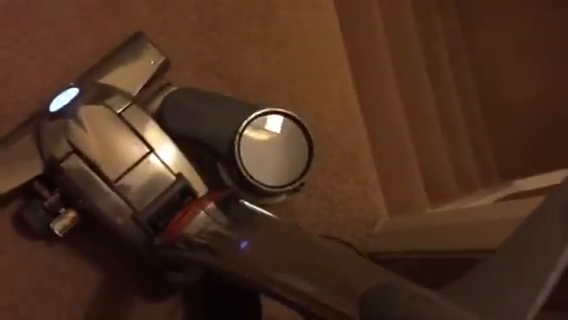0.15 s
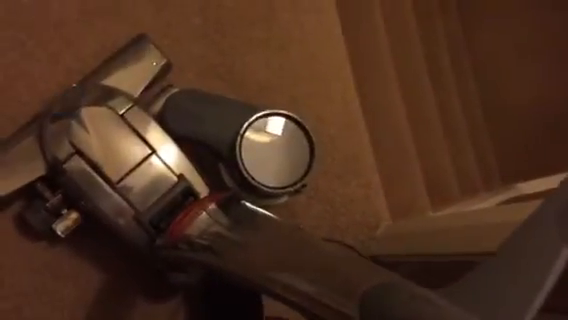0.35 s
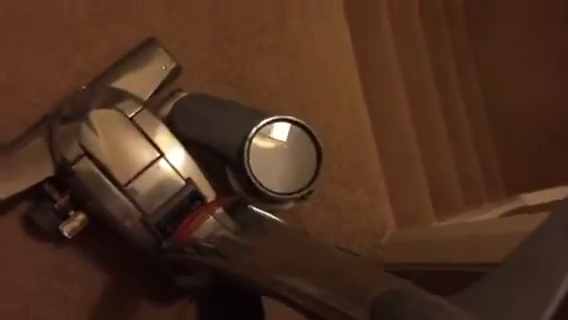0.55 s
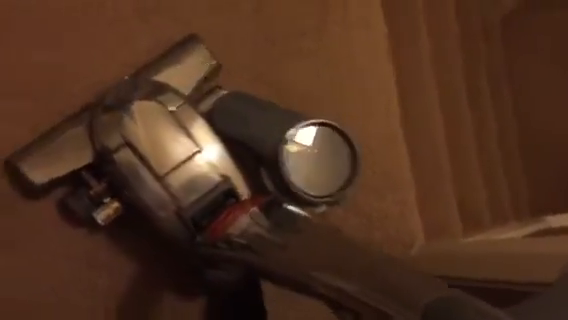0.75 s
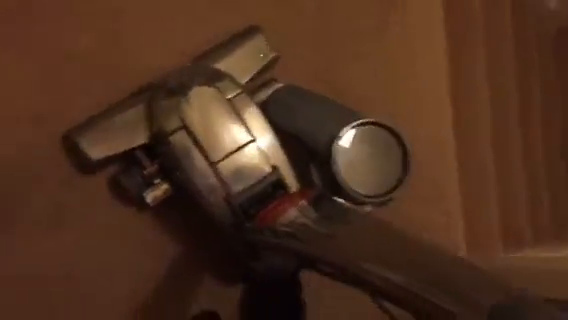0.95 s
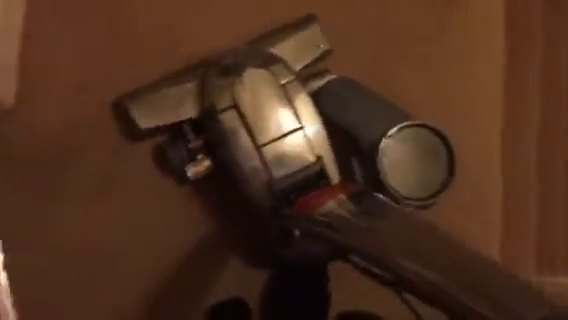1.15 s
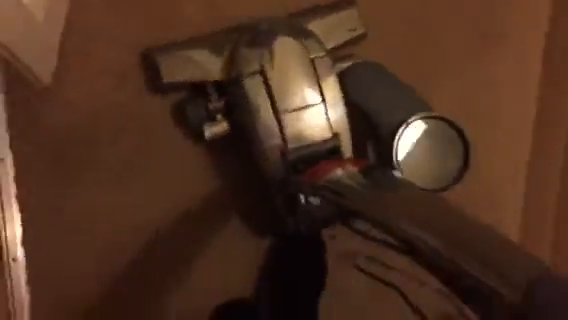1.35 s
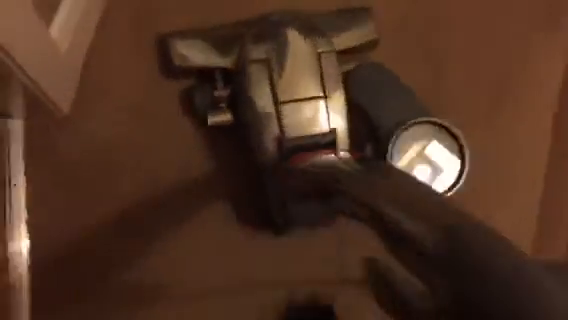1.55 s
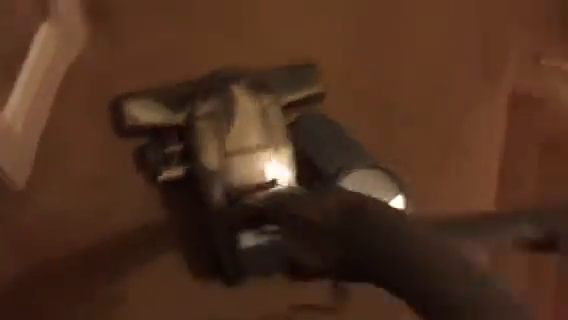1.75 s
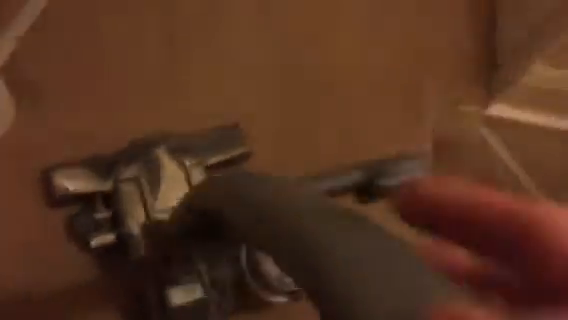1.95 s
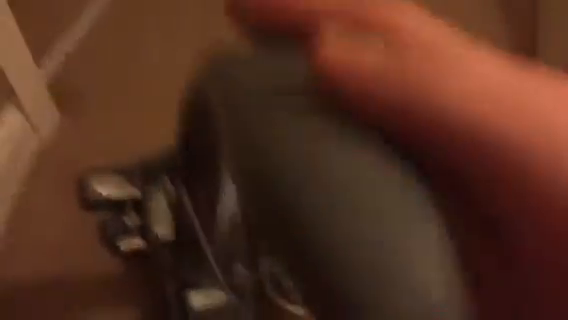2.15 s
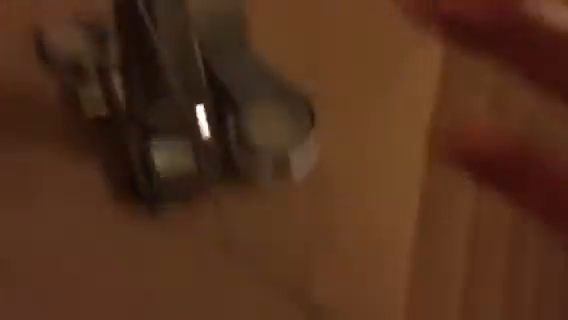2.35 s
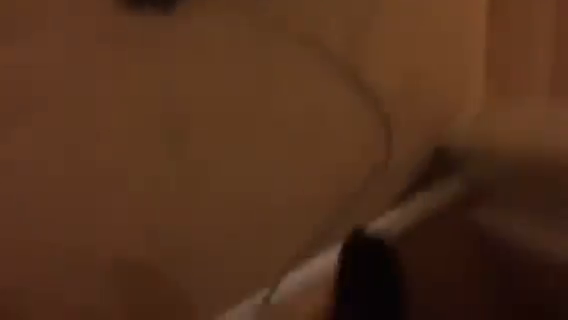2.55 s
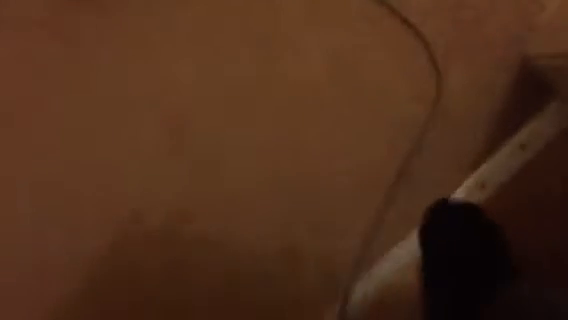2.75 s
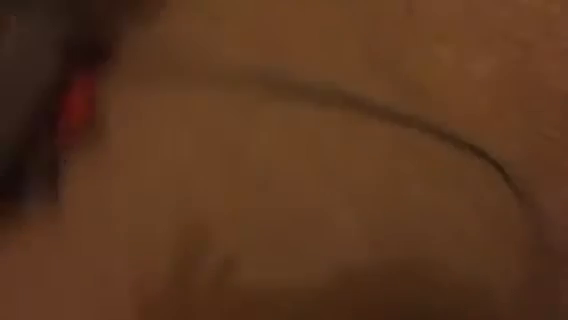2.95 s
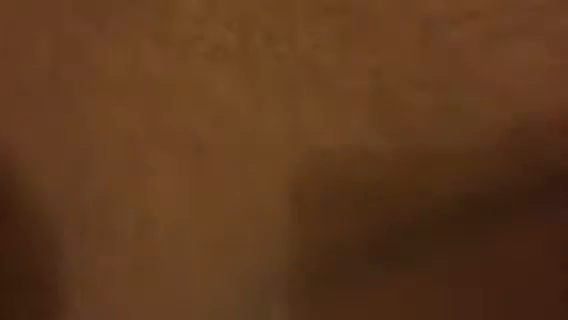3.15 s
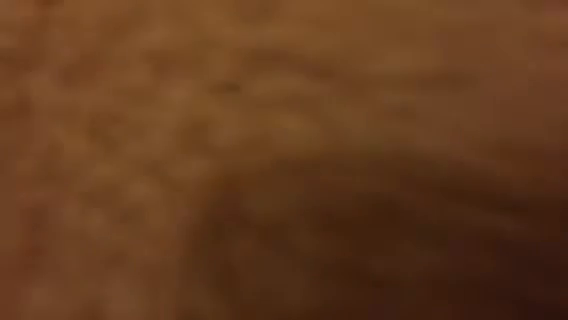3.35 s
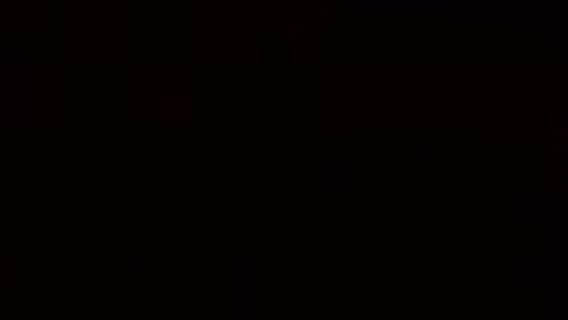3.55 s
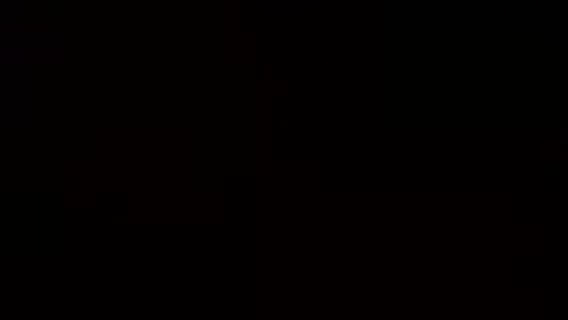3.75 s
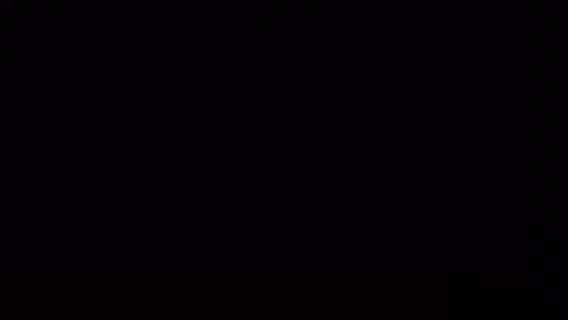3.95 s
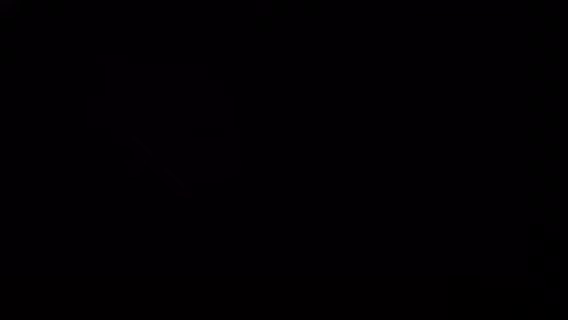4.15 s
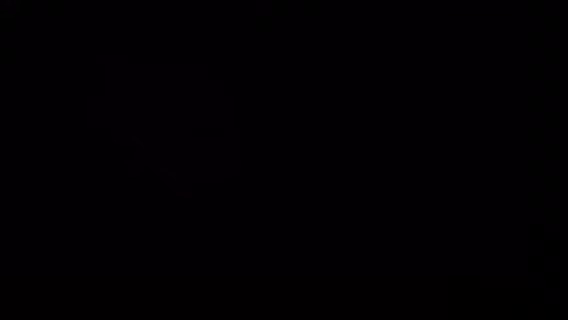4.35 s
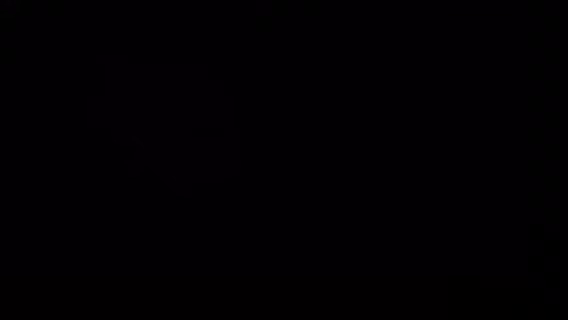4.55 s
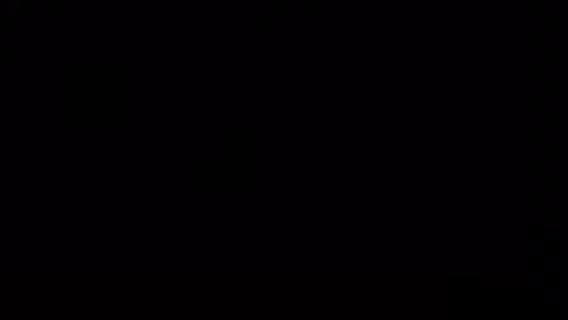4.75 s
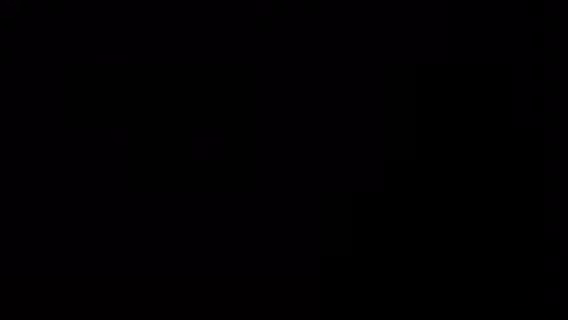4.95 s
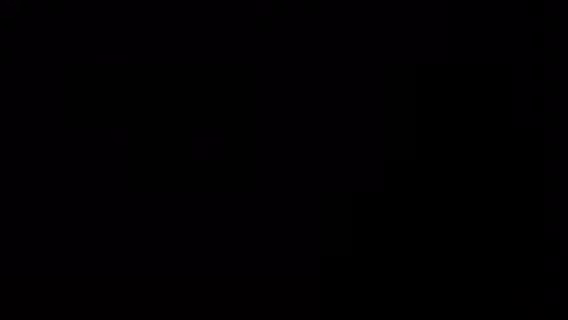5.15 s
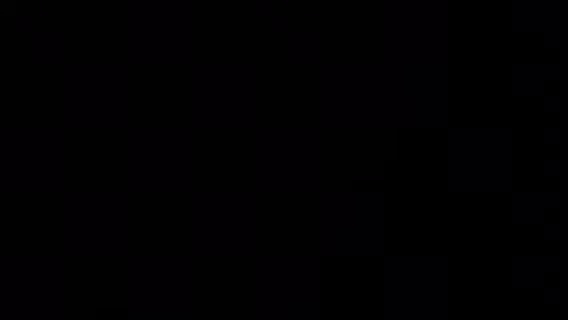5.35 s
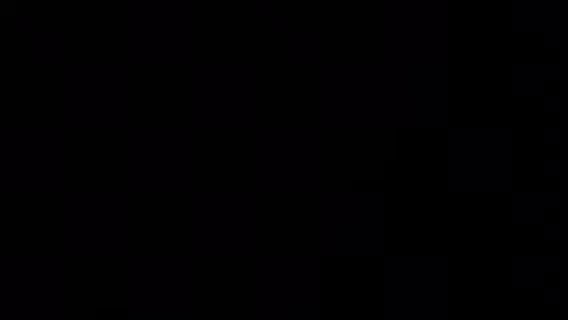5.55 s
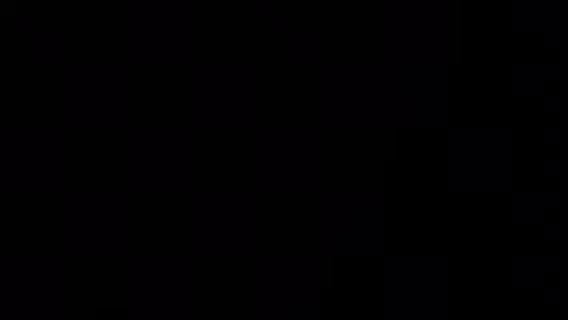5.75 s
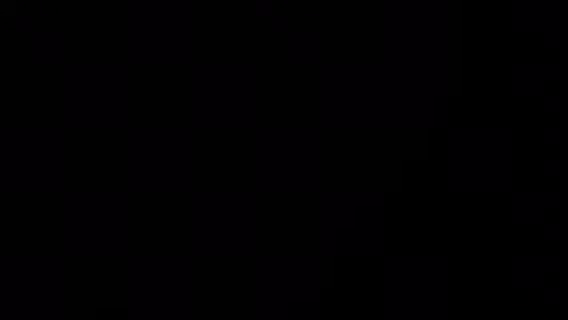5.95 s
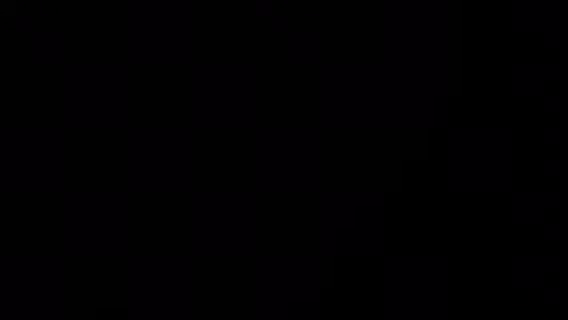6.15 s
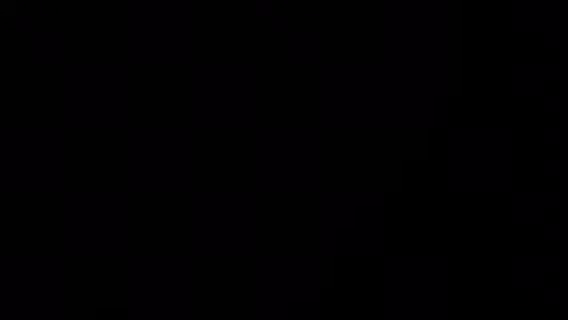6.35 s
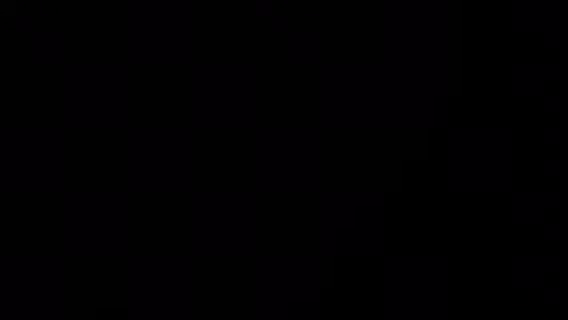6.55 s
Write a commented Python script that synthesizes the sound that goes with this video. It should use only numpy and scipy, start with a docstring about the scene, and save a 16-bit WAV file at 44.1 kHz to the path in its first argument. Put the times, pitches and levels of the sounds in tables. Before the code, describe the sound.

An upright vacuum cleaner runs at full speed close by in a small, dull carpeted room: broad rushing air, a low motor tone and a high blade whistle. At about 0.4 s power cuts and everything glides down in pitch, the air darkening and thinning, until it stops near 2.5 s. A strong plastic knock lands at 1.0 s, lesser ones at 1.6 and 1.8 s. From 2.5 to 3.5 s the phone is handled: quick clatter, a loud clack at 2.7 s, scuffs, rustle and bright swishes. At 3.6 s it hits the carpet with a brief, deep, distorted thump and rattle. Faint ticks follow, then a hard loud crack at 4.4 s with clicks to 4.6 s. Sparse muffled knocks, rubs and hollow hums continue, clearer at 5.2 and 5.5 s, ending in soft low bumps around 6.4 s over faint hiss.

```python
"""The steady roar of an upright vacuum cleaner on carpet; switched off, it coasts to rest in a small room.
Shaft and fan blades are sines locked to the falling speed; the rushing air is noise in moving colours.
A phone is handled close by, then thumps onto the carpet and overloads: a pitch-dropping sine, clipped.
Plastic parts knock (noise bursts ringing modes), hollow parts hum and cloth rustles (swelling noise).
Low rumble and hiss lie underneath."""
import sys
import numpy as np
from scipy import signal
from scipy.fft import rfft, irfft
from scipy.io import wavfile
from scipy.ndimage import uniform_filter1d

SR = 44100
rng = np.random.default_rng(int(sys.argv[2]) if len(sys.argv) > 2 else 0)


def wrap_up_sound(samples):
    """Save the sound to the file named by the first command line argument, as 16-bit audio."""
    columns = np.atleast_2d(samples).T
    # keep every value between -1 and 1, then stretch to whole-number steps
    tamed = np.clip(columns, -1, 1)
    steps = np.round(tamed * 32767).astype(np.int16)
    wavfile.write(sys.argv[1], SR, steps)


N = 290598

# Motor: loses speed to bearings (Hz/s), brush roll (1/s) and fan drag (1/s per Hz)
BLADES, OFF_S, FULL_HZ, REST_HZ = 10, .376, 254.05, 24
BEARING_DRAG, ROLL_DRAG, FAN_DRAG = 49.5, .324, .00118
# Once-a-turn tone sliding through housing and room resonances: f/Hz, level/dB
SHAFT_RESONANCE = [(35, -103), (55, -51), (78, -54), (88, -40.5), (108, -51), (122, -32), (139, -34.5),
                   (148, -42), (157, -29), (165, -39.5), (183, -24), (203, -21.5), (211, -28.5),
                   (223, -23.5), (242, -26), (254, -19.5)]
# Blade whistle sliding through the same resonances: f/Hz, level/dB
BLADE_RESONANCE = [(450, -73), (620, -54), (720, -44), (800, -58), (980, -52), (1050, -36), (1120, -40),
                   (1190, -48), (1275, -38), (1340, -46), (1400, -35), (1460, -50), (1680, -50),
                   (1740, -36), (1790, -46), (1830, -39), (1950, -42), (2070, -36), (2120, -25),
                   (2165, -26), (2205, -37), (2260, -22), (2300, -22), (2350, -33), (2420, -39),
                   (2540, -36)]
# Tones heard only under current: multiple of shaft speed, level/dB
POWERED_TONES = [(20, -40), (40, -83), (60, -63.5)]
# Weaker tones, under power and coasting: multiple of shaft speed, level/dB re air
WEAK_TONES = [(0.507, -18.5), (10.97, -22.5), (19.82, -33.5), (30, -33), (39.64, -33.5), (59.46, -38.5),
              (79.28, -43.5), (99.1, -46)]
WHINE_HZ, WHINE_WIDTH_HZ, WHINE_DB = 3050, 250, 3  # a cavity lifts each weaker tone sliding through
HUM_FADES_HZ = 72  # the weaker tones fade out below this pitch

# Air colour at high, middle and low shaft speed: f/Hz, level/dB (per Hz, relative)
AIR_FAST = [(35, -47), (62, -8.5), (82, -21), (130, -18.5), (170, -7), (280, -5.5), (350, -4), (700, -7),
            (900, -12.5), (2300, -6), (2900, -16), (3800, -16.5), (5200, -19), (16000, -39.5)]
AIR_MID = [(35, -39), (62, -20.5), (150, -6), (340, -2), (700, -11.5), (810, -18.5), (1020, -12.5),
           (1190, -17), (1860, -9), (2450, -11.5), (2650, -15), (3000, -10.5), (4500, -19), (5000, -27),
           (8200, -29.5), (16000, -51)]
AIR_SLOW = [(21, -63), (35, -37.5), (60, -25), (151, -3), (258, 4), (758, -16), (930, -2), (1330, -7),
            (1680, -0.5), (3910, -15), (5050, -19.5), (8220, -28), (16000, -53)]
FAST_HZ, MID_HZ, SLOW_HZ = 272, 127, 59  # shaft speeds of those colours
# Housing resonances in the air: f/Hz, width/Hz, level/dB
HOUSING = [(348.4, 12, 9.5), (367, 15, 1), (538, 33, 5), (693, 32, 6), (736, 20, 10), (1000, 100, 3),
           (1644, 24, 2.5), (1910, 88, 2), (2120, 40, 2), (2950, 330, 0), (4860, 540, -5)]
# Air level; the flow sags ever faster per octave of lost speed
AIR_DB, AIR_OFF_DB, AIR_DB_PER_OCTAVE, AIR_DB_PER_OCTAVE2 = -24, -2.5, 0.76, 2.5

# Landing: contact swing and floor bounce
THUMP_S, THUMP_HIGH_HZ, THUMP_LOW_HZ, THUMP_DROP_S = 3.603, 184, 51, .004
# It creeps in, slams, holds, and its bounce dies away (times re THUMP_S)
CREEP_DB, CREEP_DB_S, SLAM_AT_S, SLAM_S, SLAM_DB = -13, 1300, -.0045, .003, 11
SLAM_HOLD_S, BOUNCE_AT_S, BOUNCE_DB, BOUNCE_DB_S, BOUNCE_DB_S2 = .0055, .01, 4.5, 400, 10500
# Loose parts shaken by the landing: f/Hz, level/dB (per Hz, relative)
RATTLE_COLOUR = [(800, -18.5), (2500, 0.5), (6000, -6.5), (16000, -17.5)]
RATTLE_DB = -32  # re the swing

# Blows on plastic: t/s, peak level/dB, lows level/dB, highs level/dB (before fixed tone offsets),
# strongest ring f/Hz, ring t/s, contact t/ms, tail level/dB
KNOCKS = [(0.974, -11, 5, -7.5, 514, 0.033, 3.6, -11), (1.575, -22.5, -7, -8, 6710, 0.011, 0.94, -16),
          (1.787, -20, -18, -29, 701, 0.075, 1.65, -30), (1.903, -34, -32, -4, 6710, .012, 1.1, -20),
          (2.497, -22.5, -21, -25, 970, .02, 2.2, -6.5), (2.525, -20.5, -8.5, -9.5, 710, 0.045, 1.4, -6.5),
          (2.542, -20, -23, -23, 974, 0.017, 4, -19), (2.558, -23, -27, -14, 312, .032, 1.1, -2),
          (2.711, -7, -19, -7.5, 820, 0.0052, 1.8, -12), (2.748, -18.5, -33, -13.5, 980, .031, 0.85, -16),
          (2.885, -35, -11, -24, 620, 0.028, 1.3, -5), (2.921, -27.5, -17, -41, 980, .024, 3.9, -5),
          (2.945, -29, -9, -38, 640, 0.018, 2.2, -3), (2.972, -28.5, -9, -15, 5880, .025, 0.8, -12),
          (3.001, -27.5, -14, -15, 400, .03, 3.6, -5), (3.035, -31, -19, -9, 8100, .02, 1.1, -7),
          (3.061, -26.5, -29, -8, 848, 0.02, 1.6, -8), (3.081, -18, -20, -30, 604, 0.022, 0.41, -32),
          (3.159, -24.5, -9, -8.5, 1055, 0.019, 1.65, -10), (3.39, -36.5, 0, -32, 444, 0.0088, 4.6, -16),
          (3.425, -30.5, 4, -15, 655, 0.018, 1.66, -8), (3.565, -23, 0, -6, 614, 0.022, 0.43, -33),
          (3.59, -31, 0, -27, 1050, 0.022, 0.61, -18), (3.662, -33.5, -19, -16, 1420, 0.0057, 0.41, -22),
          (3.68, -48, -20, -20, 1384, 0.0067, 0.33, -26), (3.778, -50, -33, -27, 1415, 0.016, 1.2, -21),
          (3.834, -52, -14, -31, 610, .03, 2.1, -14), (3.853, -47, -16.5, -42, 610, 0.06, 3.1, -17),
          (3.931, -36.5, -13, -27, 1340, .037, 1.34, -13.5), (3.985, -36.5, -27, -32, 636, 0.039, 4.3, -13),
          (4.146, -50, -19, -28.5, 1400, 0.022, 3, -12), (4.239, -39, -19, -37, 608, 0.045, 2.3, -13),
          (4.373, -36, -9, -14, 406, .08, 3.1, -6), (4.39, -16.5, -24, -10.5, 1420, 0.02, 1.57, -15),
          (4.393, -6, 4, 1.5, 3560, 0.0051, 1.54, -16.5), (4.541, -27.5, -2.5, -6.5, 5880, .06, 2, -13.5),
          (4.605, -18, -8.5, -5.5, 6330, 0.045, 2.1, -12.5), (4.7, -29.5, -1, -26, 246, 0.03, 0.37, -15),
          (4.835, -41, -8, -24, 1760, .02, 1.4, -18), (4.847, -37.5, -9, -25, 750, 0.039, 2.8, -24),
          (4.917, -45, -5, -29, 2240, .02, 1.7, -18.5), (4.928, -37.5, -16, -36.5, 439, 0.078, 2.6, -13),
          (4.946, -35, -9.5, -30, 1040, 0.021, 0.54, -16), (4.975, -43, -24.5, -24, 855, 0.019, 0.72, -22),
          (5.048, -38, 4.5, -30.5, 820, 0.029, 2.2, -13), (5.1, -43, -15, -45.5, 846, 0.06, 1.2, -29),
          (5.235, -20, -13, -6, 860, 0.083, 1.9, -13), (5.492, -34, -10, -15, 857, 0.022, 2.4, -19),
          (5.499, -25, -6, -14, 870, 0.032, 2.2, -5.5), (5.651, -55, -9, -31, 433, 0.032, 2, -19),
          (5.686, -51.5, -24, -23.5, 1022, 0.019, 1, -20), (5.961, -42.5, -9, -29, 412, 0.07, 2, -7),
          (6.395, -37.5, 3.5, -23, 324, 0.021, 0.59, -22), (6.411, -33, -14, -28, 1440, 0.0098, 0.75, -28),
          (6.427, -40, -15, -26, 1070, .015, 2.4, -21.5), (6.445, -33.5, 28, -26, 220, .01, 2.6, -16),
          (6.505, -40, 4, -29, 224, .02, 3.5, -18)]
# Modes of the plastic: f/Hz, level/dB, share of the ring time
PLASTIC_MODES = [(72.6, 2, 3.5), (116, 1, 4), (242, -2, 2), (314.2, 3.5, 0.55), (416, 4, 0.22),
                 (603, -1.5, 0.62), (768, 2, 0.29), (845, 0, 0.57), (1030, 1.5, 0.39), (1448, 4, 0.5),
                 (1833, -2.5, 0.82), (2070, 4.5, 0.14), (2235, 2.5, 0.9), (3190, 1.5, 0.78),
                 (3336, 8.5, 0.8), (3730, 9.5, 1.1), (4500, 3.5, 0.72), (5100, 1.5, 0.31),
                 (5840, 2.5, 0.77), (6376, -3, 1.1), (6730, 5, 0.72), (8100, -2.5, 0.3)]
DRY_S, SCATTER_DB, RING_DB = .022, 3, 19.5
TAIL_T60_S, TAIL_HISS_DB = 0.095, 0
TOP_DB, MUFFLED_DB = -2, -14  # top octave re highs; the carpet dulls it further once the phone is down

# Low bumps through the phone's body: t/s, hold t/s, level/dB
BUMPS = [(2.51, 0.15, -40.5), (2.7, 0.044, -44), (2.83, 0.012, -51), (2.92, .02, -52), (2.98, 0.052, -49),
         (3.39, 0.005, -45), (3.45, 0.031, -35.5), (4.01, 0.03, -55), (4.22, .12, -57),
         (4.4, 0.0041, -27.5), (4.47, 0.014, -41), (4.54, 0.0089, -38.5), (4.67, 0.049, -46.5),
         (4.88, .03, -51), (4.97, 0.021, -60), (5.12, 0.091, -49.5), (5.52, 0.036, -48),
         (5.91, 0.021, -56.5), (5.99, 0.027, -58), (6.12, 0.017, -56.5), (6.34, 0.085, -44.5),
         (6.4, 0.018, -51), (6.45, 0.029, -38.5), (6.51, 0.014, -44)]
BUMP_RISE_DB_S, BUMP_FALL_DB_S = 899.5, 295
# Rubbing movements: t/s, hold t/s, scuff level/dB, cloth level/dB
RUBS = [(2.494, 0.11, -40, -45), (2.709, 0.056, -35.5, -43), (2.871, 0.18, -49.5, -52),
        (3.156, 0.098, -49.5, -56), (3.252, 0.19, -56.5, -57.5), (3.439, 0.045, -47, -54),
        (3.51, 0.074, -54, -71), (3.629, 0.032, -52, -69), (3.845, 0.017, -69.5, -84),
        (3.95, 0.072, -54, -69), (4.148, 0.013, -60.5, -84.5), (4.216, 0.11, -59, -77.5),
        (4.363, 0.024, -53, -65), (4.417, 0.05, -45, -49.5), (4.55, 0.096, -50.5, -62),
        (4.703, 0.038, -50.5, -73), (4.822, 0.14, -51.5, -65.5), (5.033, 0.03, -54.5, -68),
        (5.134, 0.14, -65, -78), (5.537, 0.072, -61.5, -73), (5.647, 0.16, -65.5, -75),
        (5.95, 0.023, -66, -71), (6.052, 0.011, -64, -73.5), (6.098, 0.043, -71, -67),
        (6.159, 0.066, -64, -60), (6.279, 0.033, -57, -55), (6.447, 0.076, -52, -65.5)]
RUB_RISE_DB_S, RUB_FALL_DB_S = 595.5, 348
# Bright hiss before the landing: a faint steady one, then swishes of handling: t/s, hold t/s, level/dB
BRIGHT_HISSES = [(1.9, 1, -79.5), (2.5, 0.057, -72), (2.78, 0.065, -59.5), (2.88, 0.33, -55),
                 (3.24, 0.15, -62), (3.41, 0.056, -59.5)]
# Hums of hollow parts, rubbed or knocked: t/s, hold t/s, level/dB, f/Hz
HOLLOW_HUMS = [(2.515, 0.088, -41, 932), (2.71, 0.11, -44, 880), (3.097, 0.11, -46.5, 540),
               (3.157, 0.067, -47.5, 972), (4.549, 0.014, -42, 309.5), (4.613, 0.035, -50.5, 348),
               (4.71, 0.031, -57, 1210), (4.822, 0.16, -60.5, 808), (5.037, 0.23, -63, 780),
               (5.574, 0.077, -64.5, 858), (5.695, 0.044, -58, 574), (5.958, 0.052, -61.5, 398),
               (6.217, 0.035, -63, 1096), (6.259, 0.074, -58.5, 960)]
HOLLOW_WIDTH_HZ = 55
# Colours of rumble, scuff, cloth and bright hiss: f/Hz, level/dB (per Hz, relative)
RUMBLE_COLOUR = [(22, -17), (45, -4), (60, 0), (68, 18), (80, 6.5), (120, -5), (180, -5), (350, -36),
                 (1000, -94.5)]
SCUFF_COLOUR = [(150, -12), (300, 2.5), (600, 5), (850, 2.5), (1100, 1.5), (1500, -6), (2500, -20.5),
                (4000, -34), (8000, -62), (14000, -91.5)]
CLOTH_COLOUR = [(900, -23), (1600, 2.5), (2800, 0), (4500, -12), (6500, -37.5), (12000, -71)]
BRIGHT_COLOUR = [(2500, -13.5), (4500, 0.5), (9000, -3), (16000, -10)]

# Background hiss colour: f/Hz, level/dB (per Hz, relative)
HISS_COLOUR = [(24, -38.5), (40, -6.5), (81, 4.5), (382, -10), (585, -3.5), (733, -4.5), (873, -3),
               (990, -7), (16000, -32.5)]
HISS_DB = -70
FAINT_S, FAINT_DB, FAINT_RISE_DB_S = 7.6, -79.5, 15  # a rise aimed past the end of the scene
ROOM_T60_S, ROOM_DB, AIR_ROOM_DB = .2, -19, -11
CLIP, KNEE, TOP_HZ = .72, 4.5, 15950


def shaft():
    """Shaft speed: steady under current, then slowed by three drags to REST_HZ; also when it gets there."""
    hz = np.linspace(FULL_HZ, REST_HZ, num=2000)
    slowing = BEARING_DRAG + ROLL_DRAG * hz + FAN_DRAG * hz ** 2  # Hz/s
    s = OFF_S + np.cumsum((hz[0] - hz[1]) / slowing)
    return np.interp(np.arange(N) / SR, s, hz), s[-1]


def tones(shaft_hz, air_db):
    """Imbalance once a turn, one whistle a blade, weaker tones, commutator whine while current flows."""
    turn = 2 * np.pi * np.cumsum(shaft_hz) / SR
    current = np.clip((OFF_S - np.arange(N) / SR) / .01, 0, 1)
    blade_hz = BLADES * shaft_hz
    out = undb(shape(SHAFT_RESONANCE, shaft_hz) + 0.49 * walk(32)) * np.sin(turn)
    out += undb(shape(BLADE_RESONANCE, blade_hz) + 0.49 * walk(40.6)) * np.sin(BLADES * turn)
    for order, db in WEAK_TONES:
        hz = order * shaft_hz
        lift_db = WHINE_DB / (1 + ((hz - WHINE_HZ) / WHINE_WIDTH_HZ) ** 2)
        gain = undb(air_db + db + lift_db + 2.5 * walk(15.0))
        out += gain * np.minimum(hz / HUM_FADES_HZ, 1) ** 4 * np.sin(order * turn)
    for order, db in POWERED_TONES:
        out += current * undb(db + 1.5 * walk(32)) * np.sin(order * turn)
    return np.sqrt(2) * out  # table levels become rms


def air(shaft_hz, air_db, flicker_db=12, drift_db=10):
    """Turbulent air through the housing; its colour slides with speed and each band flickers."""
    step = 512
    frames = dict(nperseg=4 * step, noverlap=3 * step)
    hz, s, z = signal.stft(rng.standard_normal(N), SR, **frames)
    at = np.minimum((s * SR).astype(int), N - 1)
    log_speed = np.log(shaft_hz[at])
    speeds = np.log([SLOW_HZ, MID_HZ, FAST_HZ])
    db = np.zeros(z.shape)
    for table, share in zip((AIR_SLOW, AIR_MID, AIR_FAST), np.eye(len(speeds))):
        db += np.outer(shape(table, hz), np.interp(log_speed, speeds, share))
    for f, width, gain in HOUSING:
        db += (gain / (1 + ((hz - f) / (width / 2)) ** 2))[:, None]
    band = (hz > 300) & (hz < 5000)  # the band that sets the level
    db -= 10 * np.log10(np.sum(undb(2 * db[band]), axis=0) / len(hz))
    # flicker and drift depths are before smoothing over bands, then frames
    flicker = uniform_filter1d(rng.standard_normal(db.shape), size=16, axis=0)
    db += flicker_db * uniform_filter1d(flicker, size=4, axis=1)
    drift = uniform_filter1d(rng.standard_normal(db.shape), size=8, axis=0)
    db += drift_db * uniform_filter1d(drift, size=16, axis=1)  # narrower bands swell slowly
    return undb(air_db) * signal.istft(z * undb(db), SR, **frames)[1][:N]


def cleaner():
    """Tones and roomy air follow the shaft speed, and fade out as it reaches rest."""
    shaft_hz, rest_s = shaft()
    lost = np.log2(FULL_HZ / shaft_hz)  # octaves
    air_db = AIR_DB + AIR_OFF_DB * np.minimum(lost / 0.14, 1)
    air_db = air_db - AIR_DB_PER_OCTAVE * lost - AIR_DB_PER_OCTAVE2 * lost ** 2
    rest = np.clip((rest_s - np.arange(N) / SR) / 0.038, 0, 1)
    return rest * (tones(shaft_hz, air_db) + room(air(shaft_hz, air_db), AIR_ROOM_DB, ROOM_T60_S))


def thump():
    """The phone lands: a quick contact swing gives way to the padded floor's slow bounce; parts rattle."""
    t = np.arange(N) / SR - THUMP_S
    drop = 1 + np.exp(np.clip((t - THUMP_DROP_S) / .002, -50, 50))
    turns = np.cumsum(THUMP_LOW_HZ + (THUMP_HIGH_HZ - THUMP_LOW_HZ) / drop) / SR
    swing = np.sin(2 * np.pi * (turns - turns[int(THUMP_S * SR)]))
    top, after = SLAM_AT_S + SLAM_S, np.maximum(t - BOUNCE_AT_S, 0)
    times = [SLAM_AT_S, top, top + SLAM_HOLD_S, BOUNCE_AT_S]
    db = np.interp(t, times, [CREEP_DB, SLAM_DB, SLAM_DB, BOUNCE_DB])
    db -= CREEP_DB_S * np.maximum(SLAM_AT_S - t, 0)
    db -= BOUNCE_DB_S * after + BOUNCE_DB_S2 * after ** 2
    rattle = undb(RATTLE_DB) * tint(grit(300, 7.0), RATTLE_COLOUR) * undb(-300 * after) * (t < .03)
    return undb(db) * (swing + rattle)


def knocks():
    """Each blow: a rattle of contact rings the plastic modes and cracks; a noise tail fades behind."""
    out, t = np.zeros(N + SR), np.arange(SR // 4) / SR
    hz = np.arange(1025) * SR / 2048
    mode_hz, mode_db, share = np.transpose(PLASTIC_MODES)[:, :, None]
    for s, db, low_db, high_db, ring_hz, t60, contact_ms, tail_db in KNOCKS:
        detune, scatter = rng.standard_normal((2, len(PLASTIC_MODES), 1))
        near = np.exp(-(np.log(mode_hz / ring_hz) / .07) ** 2)
        lasts = DRY_S * share * (1 - near) + t60 * near  # modes near the strongest ring take its ring time
        pitch = mode_hz * (1 + .015 * detune * (1 - near))
        body = undb(mode_db + SCATTER_DB * scatter - 60 * t / lasts) * np.sin(2 * np.pi * pitch * t)
        ring = (body * undb(RING_DB * near)).sum(axis=0)
        touch = max(contact_ms, .1) / 1000
        push = (t / touch * np.exp(1 - t / touch)) ** 2  # soft contacts swell, hard ones crack
        rattle, crack, tail = rng.standard_normal((3, len(t)))
        blow = signal.fftconvolve(ring, rattle * np.abs(rattle) * push)[:len(t)]
        ringing_tail = level(signal.fftconvolve(body.sum(axis=0), tail)[:len(t)], 0)
        tail = ringing_tail + undb(TAIL_HISS_DB) * tail
        tail_gain = undb(tail_db - 60 * t / TAIL_T60_S) * np.minimum(t / touch, 1)
        blow = blow / np.abs(blow).max() + 0.43 * crack * push + tail * tail_gain
        top_db = high_db + TOP_DB + MUFFLED_DB * (s > THUMP_S)
        colour = [(70, low_db - 8.5), (260, low_db + 4.5), (1200, 0.0022),
                  (3900, high_db), (9000, top_db), (16000, top_db - 13.5)]
        tone_filter = np.fft.fftshift(irfft(undb(shape(colour, hz))))
        blow = signal.fftconvolve(blow, tone_filter)[1024:][:len(t)]  # drop the filter's delay
        i = int(s * SR)
        out[i:i + len(t)] += undb(db) * blow / np.abs(blow).max()
    return out[:N]


def handling():
    """Hand and cloth on phone and plastic: low rumble, creaky scuffs, soft rustle; also the bright hiss."""
    rubs = np.array(RUBS)
    scuff = swells(rubs[:, [0, 1, 2]], RUB_RISE_DB_S, RUB_FALL_DB_S)
    cloth = swells(rubs[:, [0, 1, 3]], RUB_RISE_DB_S, RUB_FALL_DB_S)
    out = swells(BUMPS, BUMP_RISE_DB_S, BUMP_FALL_DB_S) * tint(grit(30, 3), RUMBLE_COLOUR)
    out += scuff * tint(creaks(180, 0.064), SCUFF_COLOUR)
    out += cloth * tint(grit(200, 6.0), CLOTH_COLOUR)
    return out + swells(BRIGHT_HISSES, 250, 300) * tint(grit(140, 4.0), BRIGHT_COLOUR)


def creaks(rate, t60):
    """Stick-slip ticks of uneven size over a little friction noise ring the plastic modes."""
    when, size, noise = rng.random(N), rng.exponential(size=N), rng.standard_normal(N)
    ticks = (when < rate / SR) * undb(3.4 * size) * np.sign(noise) + .1 * noise
    out = np.zeros(N)
    for hz, db, share in PLASTIC_MODES:
        w = 2 * np.pi * hz / SR
        r = undb(-60 / (t60 * share * SR))  # decay per sample
        out += undb(db) * np.sin(w) * signal.lfilter([1], [1, -2 * r * np.cos(w), r * r], ticks)
    return out


def hollow():
    """Uneven noise drives one narrow resonance per hum."""
    uneven, out = grit(80, 4.0), np.zeros(N)
    for s, hold, db, hz in HOLLOW_HUMS:
        hum = signal.lfilter(*signal.iirpeak(hz, hz / HOLLOW_WIDTH_HZ, SR), uneven)
        out += swells([(s, hold, db)], RUB_RISE_DB_S, RUB_FALL_DB_S) * level(hum, 0)
    return out


def room(x, wet_db, t60):
    """A short, dull tail from carpeted walls: decaying filtered noise."""
    t = np.arange(SR // 2) / SR
    tail = signal.lfilter([.4], [1, -.6], rng.standard_normal(len(t)))
    tail = tail * undb(-60 * t / t60) * (t > .006)
    return x + undb(wet_db) * signal.fftconvolve(x, tail / np.sqrt(np.sum(tail ** 2)))[:N]


def background_hiss():
    """Steady coloured noise, plus a very faint high hiss that creeps up to the end."""
    steady = undb(HISS_DB) * tint(rng.standard_normal(N), HISS_COLOUR)
    creep = swells([(FAINT_S, N / SR, FAINT_DB)], FAINT_RISE_DB_S, FAINT_RISE_DB_S)
    return steady + creep * tint(rng.standard_normal(N), BRIGHT_COLOUR)


def swells(rows, rise_db_s, fall_db_s):
    """Gain of swells (s, hold s, dB): each rises, holds and falls at shared rates; powers add."""
    t = np.arange(0, N, 32) / SR
    s, hold, db = np.transpose(rows)[:, :, None]
    db = db - rise_db_s * np.maximum(s - t, 0) - fall_db_s * np.maximum(t - s - hold, 0)
    return np.repeat(np.sqrt(np.sum(undb(2 * db), axis=0)), 32)[:N]


def grit(rate, spread_db):
    """Noise broken into short grains of very uneven size."""
    return rng.standard_normal(N) * undb(spread_db * walk(rate))


def walk(rate):
    """Random levels held 1 / rate s and slewed twice."""
    k = int(SR / rate)
    held = np.repeat(rng.standard_normal(N // k + 1), k)
    return uniform_filter1d(uniform_filter1d(held, k), k)[:N]


def tint(x, table):
    """Colour x by the spectrum of the table; rms 1."""
    hz = np.arange(N // 2 + 1) * SR / N
    return level(irfft(rfft(x) * undb(shape(table, hz)), N), 0)


def shape(table, hz):
    """dB of a spectrum table at these frequencies, on a log frequency axis."""
    f, db = np.transpose(table)
    return np.interp(np.log(hz + 1e-9), np.log(f), db, left=-90)


def level(x, db):
    """Scale x to this rms level in dB."""
    return x * undb(db) / np.sqrt(np.mean(x ** 2))


def undb(db):
    """Decibels to amplitude."""
    return 10 ** (np.asarray(db) / 20)


def scene():
    """Mix the cleaner, the landing, the close noises and the hiss."""
    close = room(knocks(), ROOM_DB, ROOM_T60_S) + handling() + hollow()
    return (cleaner() + thump() + close + background_hiss())[None]


def record(dry):
    """The input stage clips with a short knee; the top is cut."""
    wet = dry / (1 + np.abs(dry / CLIP) ** KNEE) ** (1 / KNEE)
    return signal.sosfilt(signal.ellip(10, .2, 80, TOP_HZ, fs=SR, output="sos"), wet)


dry = scene()
out = record(dry)
wrap_up_sound(out)
```